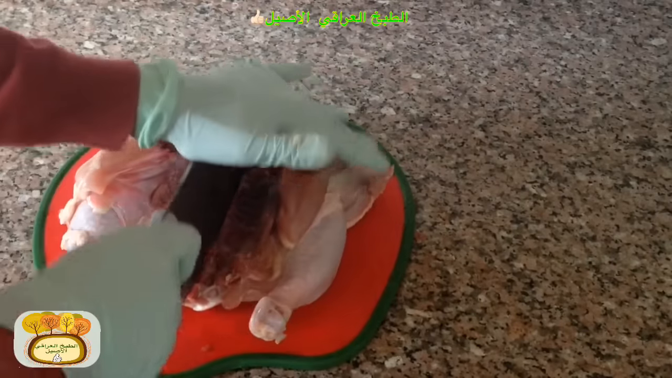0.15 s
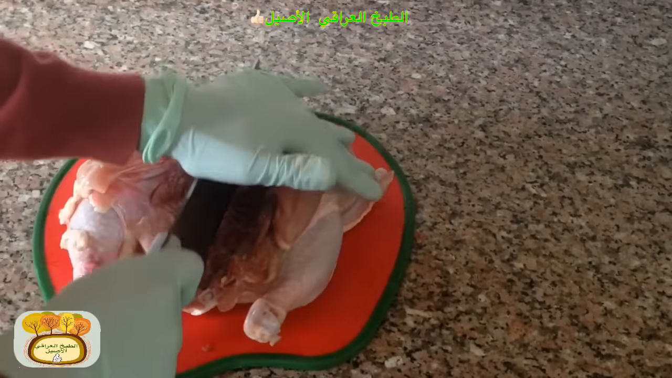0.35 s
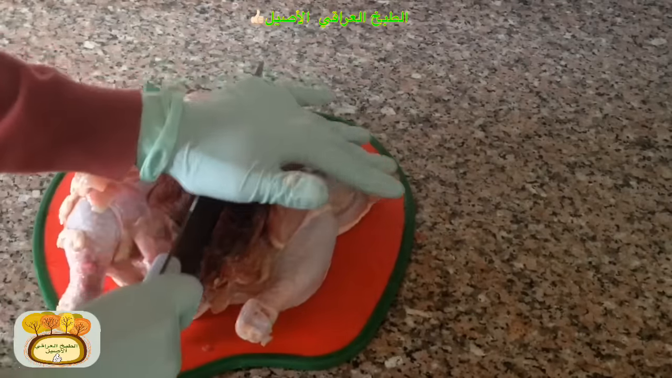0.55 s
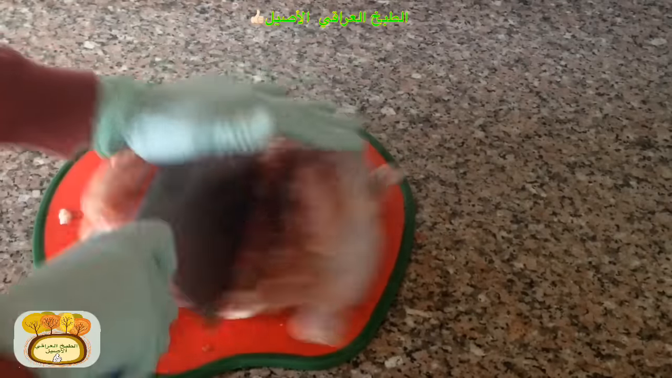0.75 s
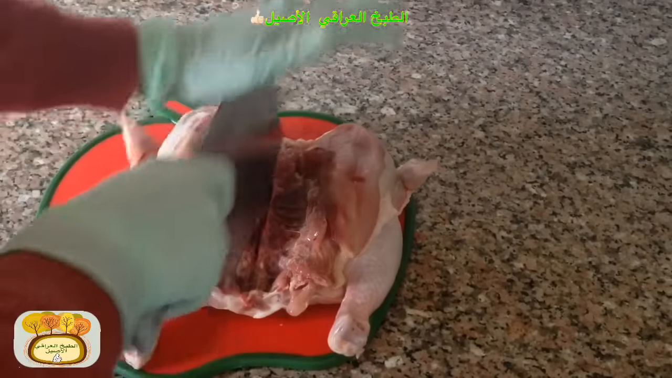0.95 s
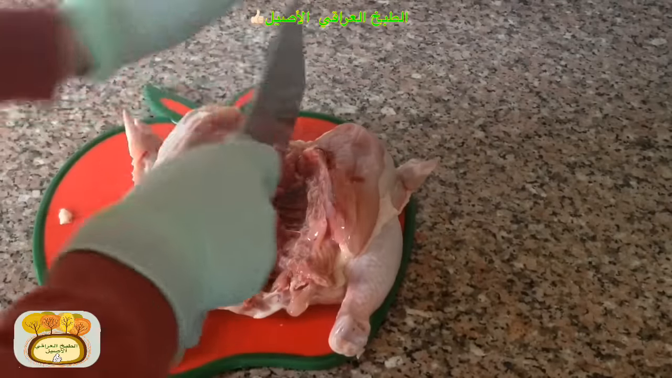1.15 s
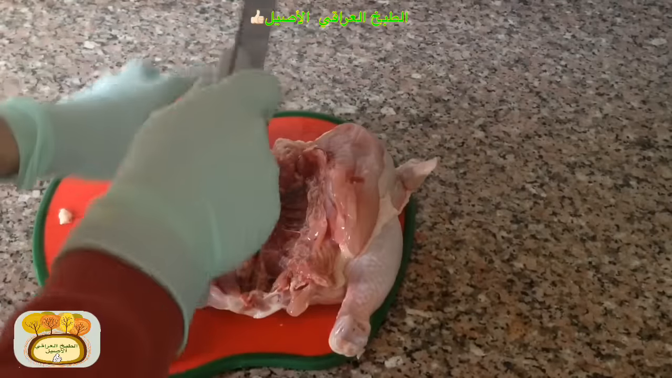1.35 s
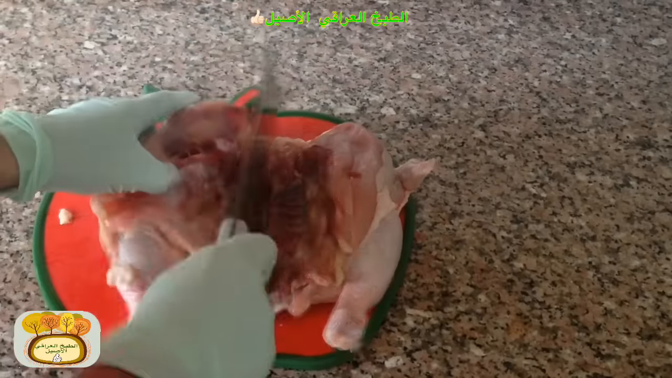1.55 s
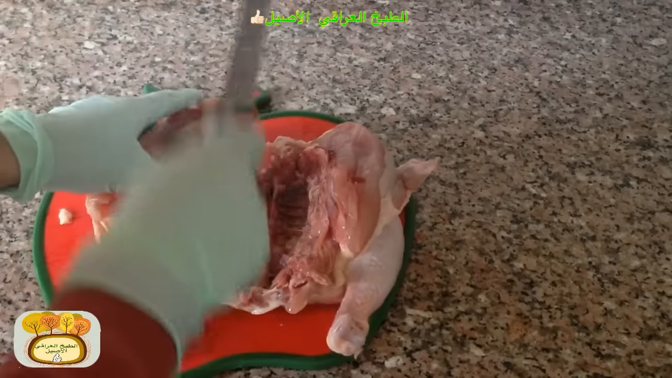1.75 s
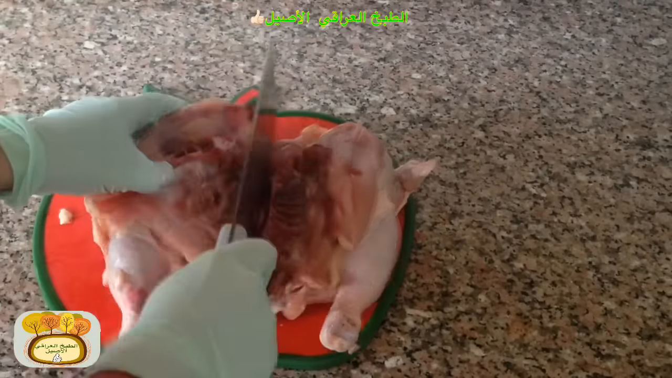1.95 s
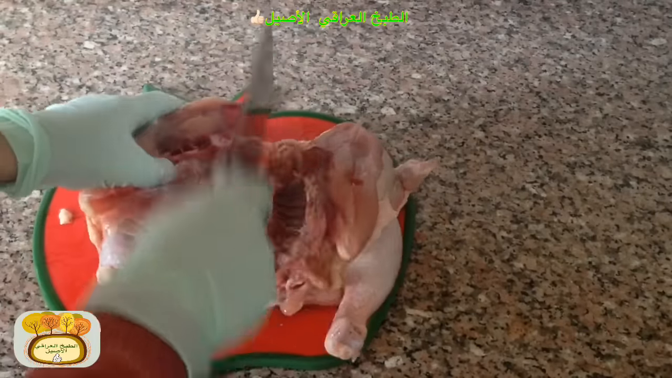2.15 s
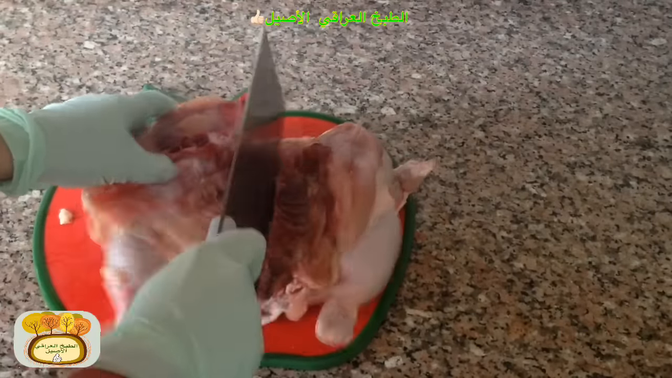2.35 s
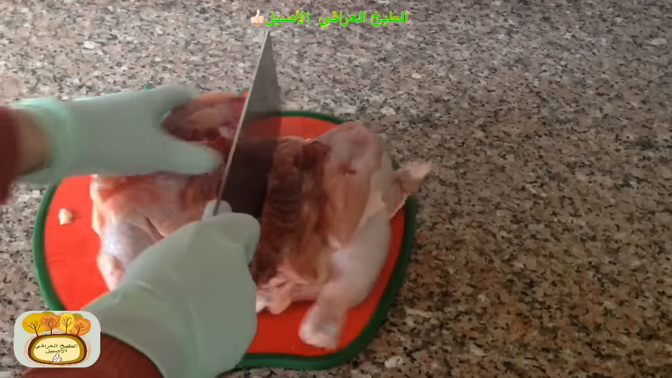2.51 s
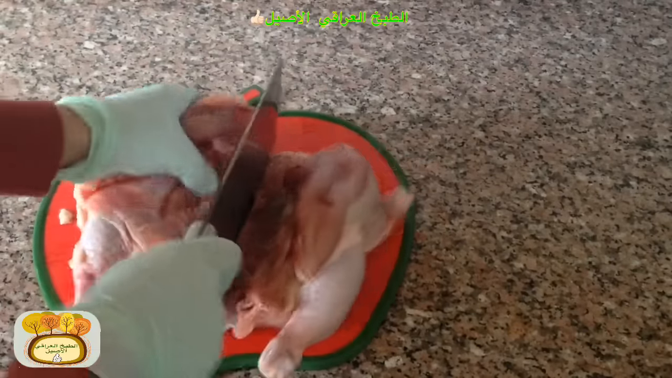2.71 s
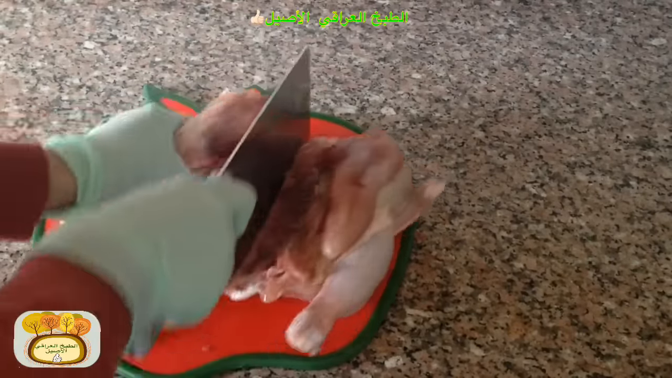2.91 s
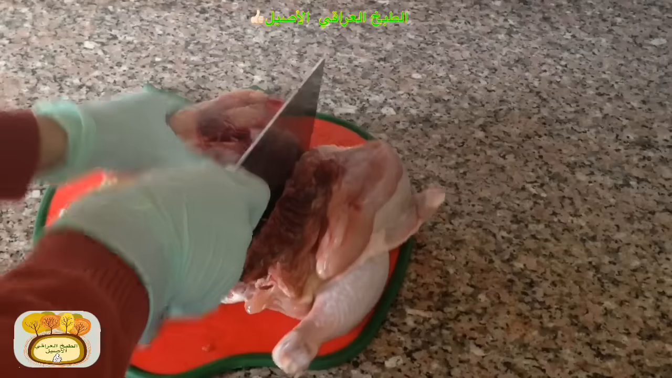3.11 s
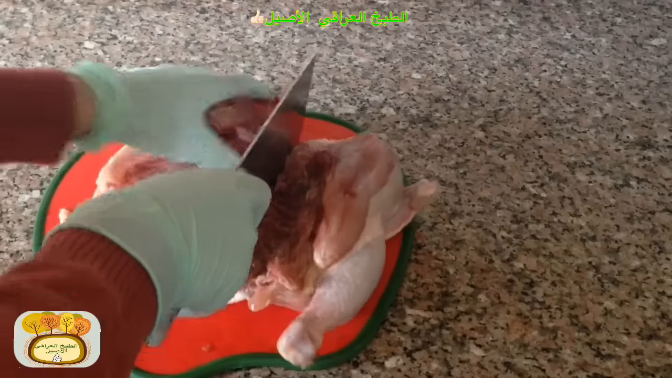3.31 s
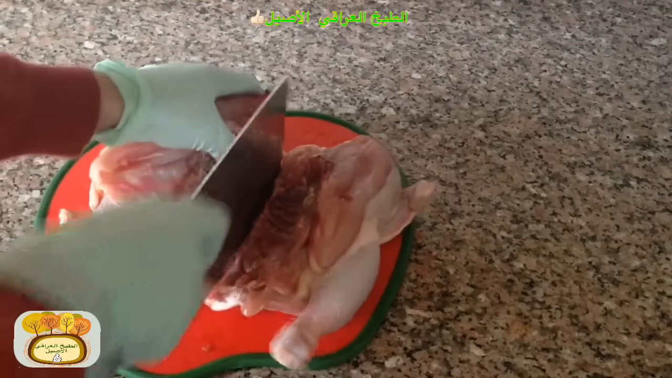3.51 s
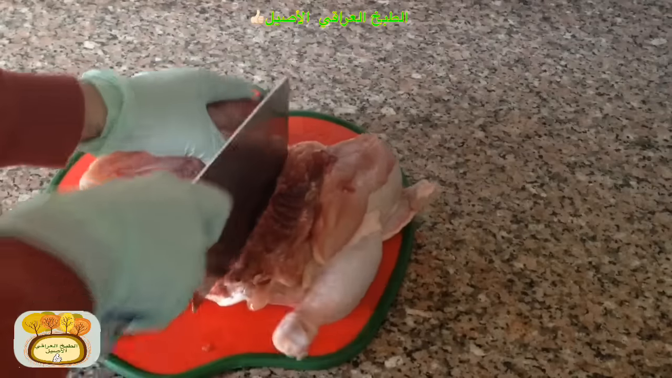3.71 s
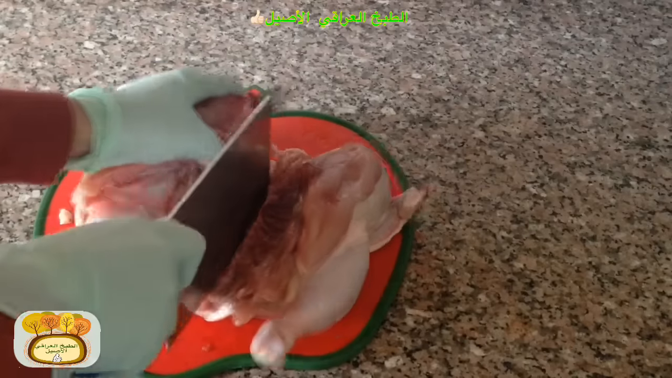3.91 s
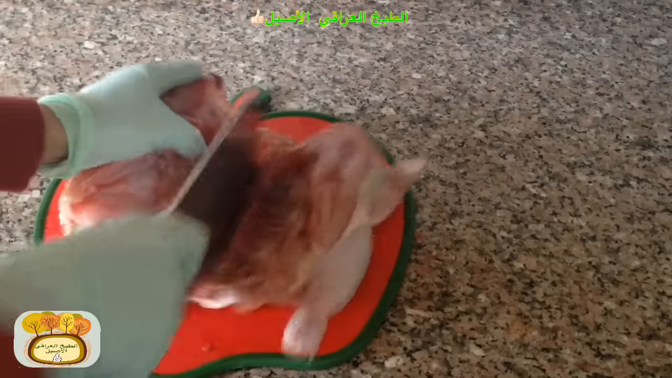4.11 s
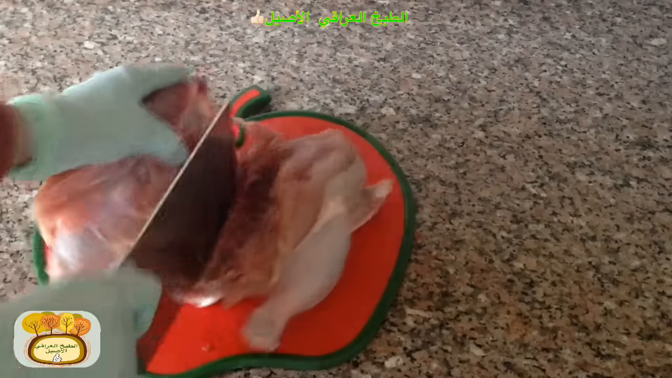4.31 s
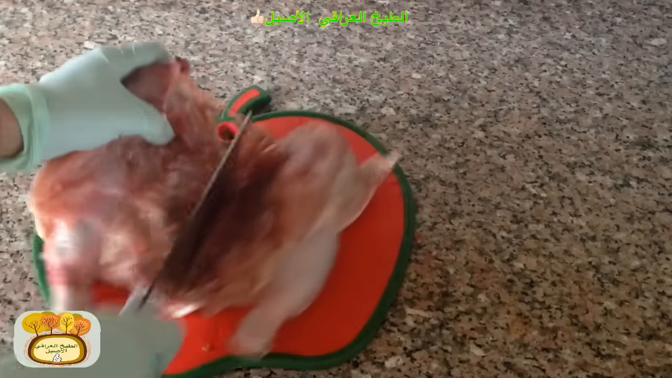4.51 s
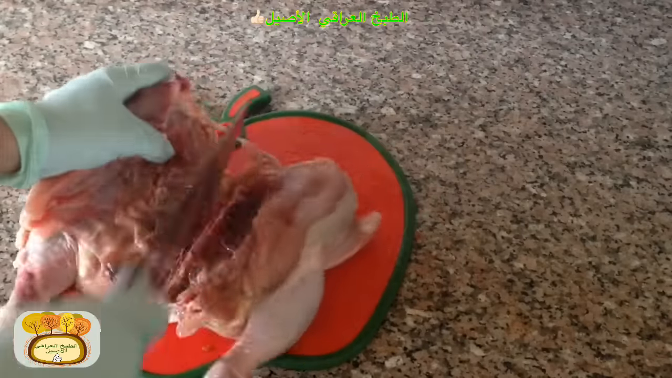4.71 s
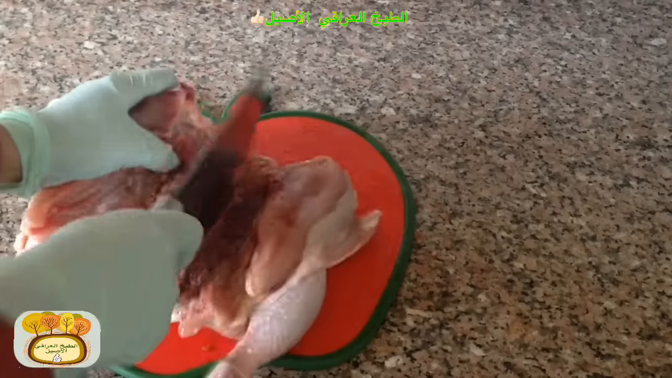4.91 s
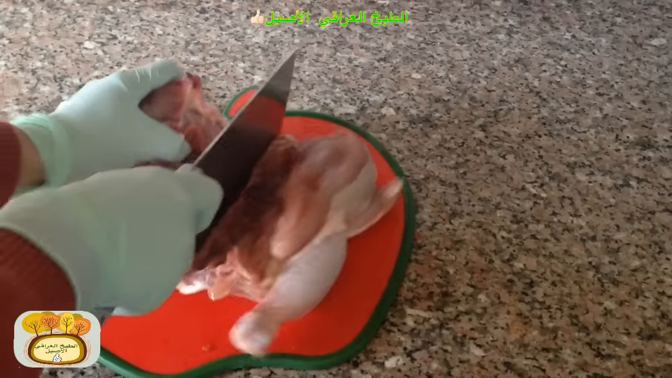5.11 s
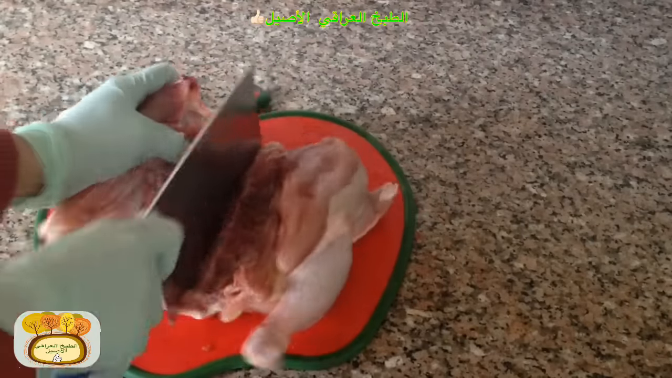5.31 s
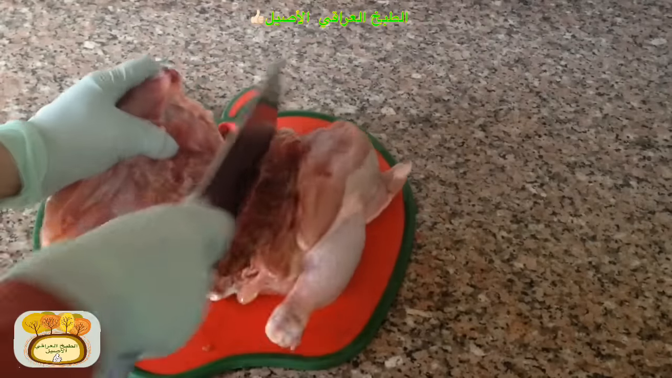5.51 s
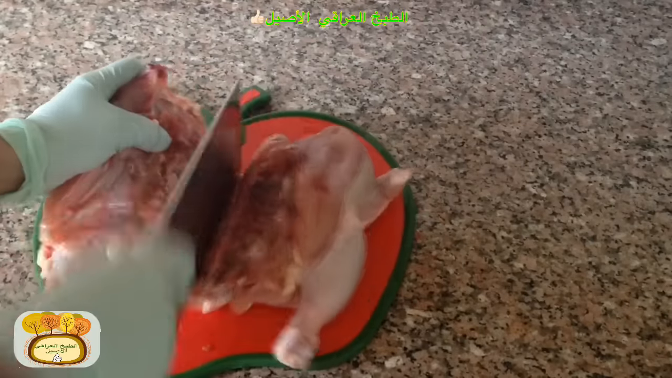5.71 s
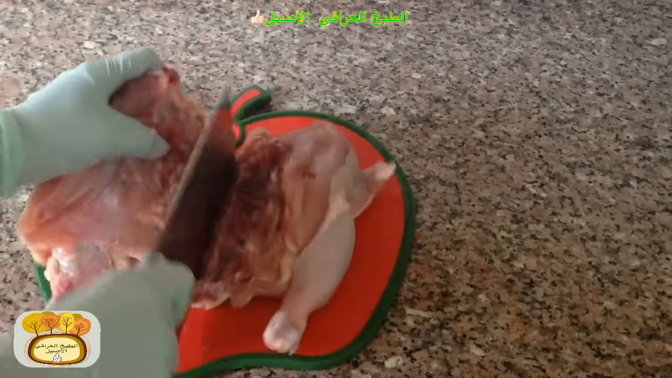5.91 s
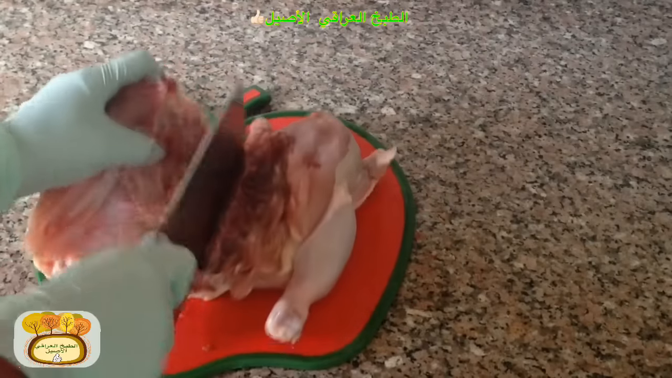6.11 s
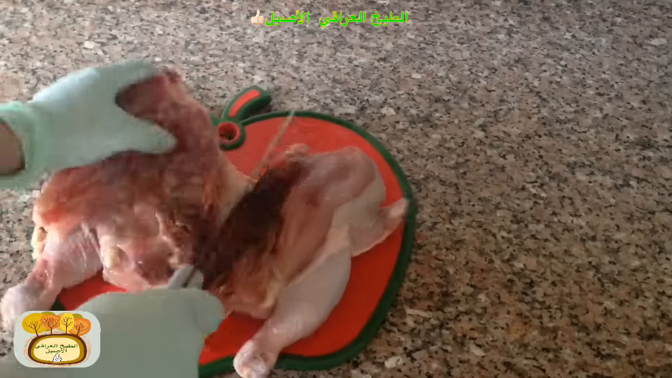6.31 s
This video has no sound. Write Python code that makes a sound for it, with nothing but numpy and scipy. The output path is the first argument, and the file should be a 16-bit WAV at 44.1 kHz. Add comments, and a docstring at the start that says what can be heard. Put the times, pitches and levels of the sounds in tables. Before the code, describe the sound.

A heavy cleaver chops raw chicken on a plastic board over a stone worktop. One chop with a quick rebound, a pause with small snaps, then three quick chops, increasingly loud, with bone crunch, board knock and low cupboard boom. Afterwards softer knocks, wet squelches and gristle snaps. Close microphone, bare reverberant kitchen, faint hiss.

```python
"""A heavy cleaver chops a raw chicken on a plastic board that lies on a stone worktop, in a bare, ringing kitchen.
In each of four chops wet flesh parts, bone crunches as a burst of tiny fractures, then struck modes ring:
the edge knocks the board, the load thuds on the worktop and a cupboard panel booms.
The board also knocks in a loud rebound after the first chop, then mostly softer as meat is dropped or pressed;
gristle snaps, wet meat squelches in swarms of pops, late fibres tick; reverberation and noise complete the scene."""
import sys
import numpy as np
from scipy import signal
from scipy.fft import rfft, irfft
from scipy.io import wavfile

SR = 44100
rng = np.random.default_rng(int(sys.argv[2]) if len(sys.argv) > 2 else 0)


def waveform_to_disk(signal):
    """Save audio, clipped to [-1, 1], as 16-bit WAV at the path in sys.argv[1]."""
    frames = np.transpose(np.atleast_2d(signal))
    scaled = np.clip(frames, -1, 1) * 32767
    samples = np.round(scaled).astype(np.int16)
    wavfile.write(sys.argv[1], SR, samples)


N = 280035

TOP_HZ = 15500  # upper edge of the audible band here
T = np.arange(SR // 2) / SR  # time within one event, s
CLICK = signal.unit_impulse(len(T))
SNAP_ROOM_DB = -2.5  # share of snaps and fibre ticks sent to the walls


def undb(db):
    """Logarithmic levels: decibels become an amplitude ratio."""
    return 10 ** (np.asarray(db) / 20)


def along(hz, table, axis=1):
    """Logarithmic frequency scale: one column of a table is interpolated along it."""
    table = np.array(table)
    return np.interp(np.log(np.maximum(hz, 1)), np.log(table[:, 0]), table[:, axis])


def colour(x, spectrum, tilt_db=0, size=2048):
    """Minimum-phase filtering: a folded cepstrum makes the spectrum causal, tilted in dB an octave."""
    hz = np.maximum(np.fft.rfftfreq(size, 1 / SR), 20)
    gain_db = along(hz, spectrum) + tilt_db * np.log2(hz)
    cepstrum = irfft(np.log(undb(gain_db)))
    cepstrum[1:size // 2] *= 2
    cepstrum[size // 2 + 1:] = 0
    impulse_response = irfft(np.exp(rfft(cepstrum)))
    return signal.fftconvolve(x, impulse_response)[:len(x)]


def level(x, db=0, seconds=.01):
    """Energy scaling: x gets the energy of a sound that holds this level for so many seconds."""
    return x * undb(db) * np.sqrt(seconds * SR / np.sum(x ** 2))


def fade(t, t60):
    """Exponential damping: the amplitude is 60 dB down after t60."""
    return np.exp(-np.log(1000) * t / t60)


def ring(modes, pitch=1):
    """Modal superposition: a struck body rings freely as a sum of damped sines."""
    return sum(undb(db) * np.sin(2 * np.pi * hz * pitch * T) * fade(T, t60) for hz, db, t60 in modes)


def grains(seconds, spread_db, largest=5):
    """Shot noise: a swell of dense tiny clicks, a few of them much larger than the rest."""
    sign = rng.standard_normal(len(T))
    size = np.minimum(rng.exponential(size=len(T)), largest)
    swell = np.sin(np.pi * np.minimum(T / max(seconds, 10 / SR), 1))
    return sign * undb(spread_db * size) * swell


def add(bus, s, near, far):
    """Superposition: an event joins the direct row and the row that reaches the walls."""
    start = int(s * SR)
    pair = np.array([near, far])[:, :N - start]
    bus[:, start:start + pair.shape[1]] += pair


def chops():
    """Impact sequence: flesh parts, bone crunches, the board is met mid-crunch and the cupboard shakes."""
    # full swings; pitch_ratio of the board is set by the meat's load:
    # start_s, knock_db, thud_db, pitch_ratio, contact_cutoff_hz, bone_db, crunch_ms, cupboard_db
    swings = [(0.3635, -22, -31.5, 1.16, 2340, -25, 1.07, -31.5),
              (1.6037, -19.5, -19, 0.6, 2130, -30.5, 6.7, -28.5),
              (2.0059, -9.5, -21, 1.0, 2000, -16.5, 8.9, -27),
              (2.408, -6.5, -26.5, 0.8, 6080, -10.5, 9.54, -29.5)]
    # the edge parts the flesh before it meets bone
    entry_lead_s, entry_s, entry_tilt_db = 0.019, .026, -5
    entry_under_thud_db = -18  # the thicker the meat, the more of both thud and squelch
    # a crunch louder than this is duller (tilt in dB an octave per dB)
    crunch_plain_db, crunch_tilt_per_db = -26.5, -0.14
    flesh, bone, board, cupboard = [], [], [], []
    for s, knock_db, thud_db, pitch, contact_hz, bone_db, crunch_ms, cupboard_db in swings:
        flesh.append((s - entry_lead_s, thud_db + entry_under_thud_db, entry_s))
        crunch_tilt_db = crunch_tilt_per_db * (bone_db - crunch_plain_db)
        bone.append((s - crunch_ms / 1000 / 2, bone_db, crunch_ms, crunch_tilt_db))
        board.append((s, knock_db, thud_db, pitch, contact_hz))
        cupboard.append((s, cupboard_db))
    entry = squelches(flesh, entry_tilt_db)
    crunch = cracks(bone, room_db=-0.5)
    return entry + crunch + blows(board, room_db=-2) + booms(cupboard)


def blows(rows, room_db, slap_db=-10, slap_t60=.07, radiate_hz=140, push_hz=800,
          far_modes_db=-6.0, far_thud_db=0, lead_cycles=4):
    """Modal excitation by contact: the worktop thuds, then the board's modes ring over a slap of meat."""
    # plastic board, damped by the meat, before the pitch ratio: pitch_hz, level_db, t60_s
    board_modes = [(402, -15.5, 0.12), (646.5, -8.5, 0.048), (1052.6, 1, 0.046), (1214, -12, 0.061),
                   (1392, -5.5, .035), (1755, -7, 0.037), (2025, -5.5, 0.028), (2650, -13, .03),
                   (3134, -12, 0.039)]
    # worktop under the load: pitch_hz, level_db, t60_s
    worktop_modes = [(129.6, -12, 0.25), (173, -3.5, 0.052), (206, -0.5, 0.05), (347, -4.5, 0.032),
                     (550, -3, 0.036)]
    # spectrum of the meat's slap: frequency_hz, level_db
    slap_spectrum = [(30, -27), (150, -12), (450, -11.5), (650, -5.5), (880, -1), (1080, 0.5), (1450, -5),
                     (2100, -10), (4000, -17), (9000, -21.5)]
    bus = np.zeros((2, N))
    for s, knock_db, thud_db, pitch, contact_hz in rows:
        # a lower contact cut-off, as under more meat, means a longer contact and a duller knock
        contact = signal.butter(2, min(contact_hz, TOP_HZ), fs=SR)
        modes = signal.lfilter(*signal.butter(1, 300, "high", fs=SR), ring(board_modes, pitch))
        slap = colour(rng.standard_normal(len(T)) * fade(T, slap_t60), slap_spectrum)
        near = signal.lfilter(*contact, level(modes) + level(slap, slap_db))
        # the walls hear the board from all sides, so its peaks even out
        even = level(colour(CLICK, slap_spectrum))
        far = signal.lfilter(*contact, even + level(modes, far_modes_db))
        add(bus, s, level(near, knock_db), level(far, knock_db + room_db))
        # the meat passes the push on before the board knocks
        thud_band = signal.butter(2, [radiate_hz, push_hz], "band", fs=SR)
        thud = level(signal.lfilter(*thud_band, ring(worktop_modes)), thud_db)
        add(bus, s - lead_cycles / contact_hz, thud, thud * undb(far_thud_db))
    return bus


def cracks(rows, room_db, scatter_t60=0.041, scatter_db=-3, blade_db=-7.5):
    """Brittle fracture: a run of tiny breaks, scattered by board and worktop, also sets the blade ringing."""
    # spectrum of breaking bone: frequency_hz, level_db
    bone_spectrum = [(30, -73), (200, -23), (900, -6), (2000, -3), (3400, 1.5), (5800, -2.5), (8200, -3),
                     (11500, -5.5), (15500, -17)]
    # cleaver blade, gripped by the meat: pitch_hz, level_db, t60_s
    blade_modes = [(2462, -2, 0.041), (3412, 3.5, 0.027), (5080, -9.5, 0.016), (8286, 0.5, 0.013)]
    bus = np.zeros((2, N))
    for s, db, ms, tilt_db in rows:
        breaks = grains(ms / 1000, spread_db=2.5)
        scatter_envelope = signal.fftconvolve(abs(breaks), fade(T, scatter_t60))[:len(T)]
        scatter = rng.standard_normal(len(T)) * scatter_envelope
        bone = colour(level(breaks) + level(scatter, scatter_db), bone_spectrum, tilt_db)
        blade = signal.fftconvolve(breaks, ring(blade_modes))[:len(T)]
        near = level(bone) + level(blade, blade_db)
        # summed over all directions the fractures merge into one smooth snap
        far = colour(CLICK, bone_spectrum, tilt_db)
        add(bus, s, level(near, db), level(far, db + room_db))
    return bus


def squelches(rows, tilt_db, room_db=-3):
    """Film rupture: wet films tear in swarms of little pops."""
    # spectrum of wet films: frequency_hz, level_db
    wet_spectrum = [(30, -33.5), (200, -5), (900, -1), (1800, 0.5), (3200, 3.5), (5500, -3.5), (8200, -1.5),
                    (12000, -8), (15500, -7)]
    bus = np.zeros((2, N))
    for s, db, seconds in rows:
        swarm = grains(seconds, spread_db=5.5, largest=5)
        pops = level(colour(swarm, wet_spectrum, tilt_db), db, seconds)
        add(bus, s, pops, pops * undb(room_db))
    return bus


def booms(rows, room_db=0):
    """Panel resonance: a full swing shakes the panel of the cupboard under the worktop."""
    # cupboard panel: multiple_of_lowest_mode, level_db, t60_s
    panel_modes = [(1, -5.5, .45), (1.8, 3.5, .4), (2.95, 8, 0.29)]
    lowest_hz = 47.5
    bus = np.zeros((2, N))
    for s, db in rows:
        boom = level(ring(panel_modes, lowest_hz), db)
        add(bus, s, boom, boom * undb(room_db))
    return bus


def handling():
    """Contact, fracture and sliding apart from the swings: the board knocks, gristle snaps, wet meat slides."""
    # the board knocks: a loud rebound after the first chop, then mostly softer knocks as meat is
    # dropped or pressed: start_s, knock_db, thud_db, pitch_ratio, contact_cutoff_hz
    knocks = [(0.3870, -20.5, -39, 0.9, 2090), (0.825, -57, -55.5, 0.55, 1190),
              (0.923, -50, -54.5, 0.54, 2500), (3.6376, -56, -52.5, 1.2, 2540),
              (3.674, -43, -44.5, 1.1, 2300), (3.72, -36, -45, 1.22, 2900), (3.9676, -58, -63, 1.05, 2510),
              (4.0079, -48.5, -48.5, 1.23, 2920), (4.371, -59, -56, 0.48, 903),
              (5.3402, -33, -34.5, 1.2, 2200), (5.3538, -44, -33.5, 0.71, 2470),
              (5.413, -34, -47, 0.613, 5000), (5.822, -57.5, -59, 0.496, 2007),
              (5.883, -46.5, -52, 1.27, 2980), (6.257, -57.5, -61, 0.63, 890)]
    # gristle and small bones give way: start_s, level_db, length_ms, tilt_db_per_octave
    snaps = [(0.3876, -32.5, 1.9, 3.5), (0.668, -52.5, 4, 4), (0.7715, -46.5, 1.8, 3), (0.921, -38, 3.7, 1),
             (2.9261, -47, 3.1, -3), (2.9895, -38, 1.64, 1.5), (3.6722, -51.5, 2.4, -2),
             (3.7172, -35.5, 4, 4), (4.0058, -44.5, 3.1, 2.5), (4.0274, -44, 0.65, 3), (4.55, -52, 4.7, 0),
             (4.5654, -47, 2.7, 1.5), (4.5724, -40.5, 2.5, 3), (5.288, -49, 3.6, 6),
             (5.3538, -34, 2.8, -3.5), (5.356, -32, 80, -4.5), (5.3868, -34.5, 1.9, -6.5),
             (5.8736, -50.5, 0.58, -4), (5.883, -50, 4.9, -1), (5.972, -52.5, 2.9, -3),
             (6.3072, -54.5, 5.6, 8)]
    # wet meat slides on steel, glove and board: start_s, level_db, length_s
    slides = [(0.632, -54.5, 0.035), (0.913, -46.5, 0.017), (3.437, -63.5, 0.18), (3.701, -44.5, 0.06),
              (3.886, -56.5, .07), (4.012, -54, 0.1), (4.195, -54, 0.098), (4.339, -64.5, 0.16),
              (4.992, -49.5, 0.044), (5.236, -49, 0.034), (5.258, -50.5, .03), (5.694, -59.5, 0.041),
              (5.777, -54.5, 0.07), (5.9, -59, 0.078), (6.254, -65.5, 0.063)]
    # these knocks have less bass in their thuds than the full swings
    knocking = blows(knocks, room_db=-2.5, radiate_hz=191.6)
    return knocking + cracks(snaps, SNAP_ROOM_DB) + squelches(slides, tilt_db=2)


def fibres():
    """Random fracture: faint ticks of tearing fibres, at uniformly random moments of the late levering."""
    from_s, to_s, per_s = 3.4, 6.33, 6
    middle_db, spread_db, length_ms, tilt_db = -67, 9.5, 2, 2.5  # spread either way; tilt per octave
    span = to_s - from_s
    ticks = []
    for when, size in rng.random((int(per_s * span), 2)):
        tick_db = middle_db + spread_db * (2 * size - 1)
        ticks.append((from_s + span * when, tick_db, length_ms, tilt_db))
    return cracks(ticks, SNAP_ROOM_DB)


def kitchen(x, first_s=0.006, build_s=0.027, count=18):
    """Diffuse reverberation: reflections off hard walls thicken, then each band dies at its own rate."""
    # reverberation, level against the sound sent to the walls: frequency_hz, level_db, t60_s
    reverberation = [(60.4, 4.5, 0.93), (203, -4.5, 0.55), (450, -1, .75), (920, -3.5, 0.92),
                     (1800, -0.5, 0.82), (4020, -4.5, 0.84), (7900, -6.5, 0.56), (14800, -14, 0.3)]
    t = np.arange(SR * 3 // 2) / SR
    hz = np.maximum(np.fft.rfftfreq(len(t), 1 / SR), 1)
    noise = rfft(rng.standard_normal(len(t)))
    onset = np.clip((t - first_s) / build_s, 0, 1) ** .5
    centres = np.geomspace(40, TOP_HZ, count)
    response = 0
    for centre, pick in zip(centres, np.eye(count)):
        # overlapping triangular bands on the log-frequency axis
        band = irfft(noise * np.interp(np.log(hz), np.log(centres), pick), len(t))
        envelope = onset * fade(t, along(centre, reverberation, axis=2))
        band_gain = undb(along(centre, reverberation))
        response = response + band_gain * band * envelope / np.linalg.norm(envelope)
    return signal.fftconvolve(x, response)[:N]


def background():
    """Stationary coloured noise: faint room rumble under an even microphone hiss."""
    # rumble and hiss: frequency_hz, level_db
    hiss_spectrum = [(20, -12.5), (45, -4), (130, -0.5), (400, -5.5), (900, -13), (1650, -9), (2200, -15.5),
                     (3800, -13), (7000, -14.5), (15000, -16)]
    noise = colour(rng.standard_normal(N), hiss_spectrum, size=8192)
    return level(noise, -62.5, N / SR)


def scene():
    """Direct and reverberant fields: close sounds of the work, their reflections and the quiet room."""
    direct, to_room = chops() + handling() + fibres()
    return (direct + kitchen(to_room) + background())[None]


def gain_control(x, threshold_db=-20, slope=0.13, recovery_db_per_s=17, react_hz=7):
    """Dynamic compression: a held peak level turns the gain down with a lag, then lets it creep back."""
    # the held peak, not the gain itself, falls by recovery_db_per_s
    creep = recovery_db_per_s * np.arange(N) / SR
    peak_db = 20 * np.log10(abs(x) + 1e-9)
    held_db = np.maximum.accumulate(peak_db + creep, axis=-1) - creep
    cut_db = slope * np.maximum(held_db - threshold_db, 0)
    lagged_cut_db = signal.lfilter(*signal.butter(1, react_hz, fs=SR), cut_db)
    return x * undb(-lagged_cut_db)


def record(dry, low_cut_hz=35):
    """Band limiting and saturation: deep bass drops, gain rides, the highest peaks round, the top is cut."""
    low_cut = signal.butter(3, low_cut_hz, "high", fs=SR, output="sos")
    x = gain_control(signal.sosfilt(low_cut, dry))
    ceiling = .9  # amplitude that the rounding approaches
    rounded = x / (1 + (x / ceiling) ** 4) ** (1 / 4)
    top_cut = signal.ellip(10, .2, 70, TOP_HZ, fs=SR, output="sos")
    return signal.sosfilt(top_cut, rounded)


dry = scene()
out = record(dry)
waveform_to_disk(out)
```